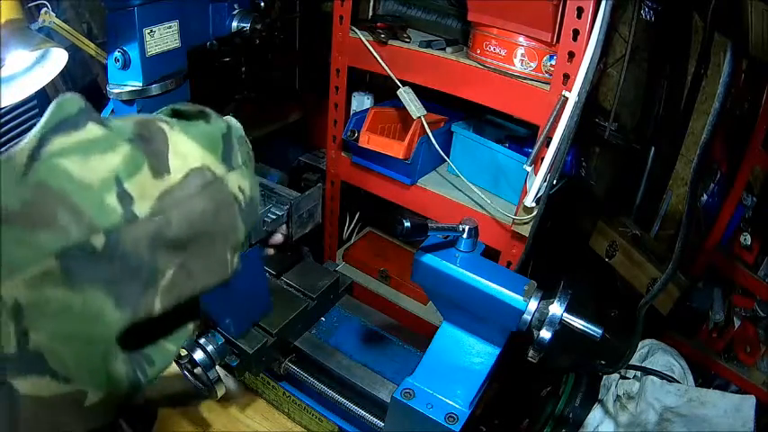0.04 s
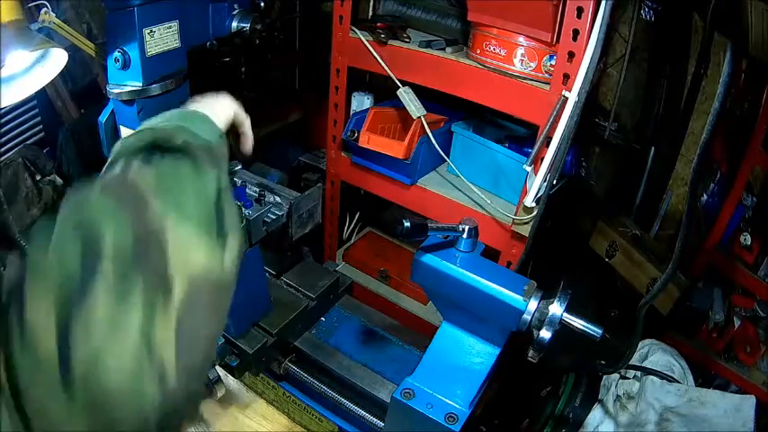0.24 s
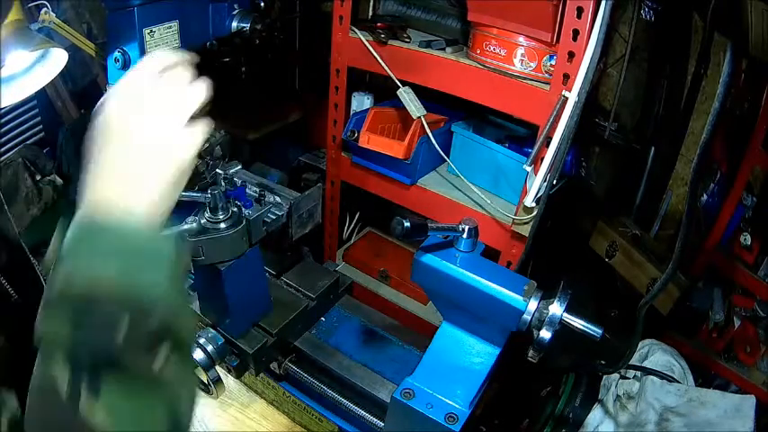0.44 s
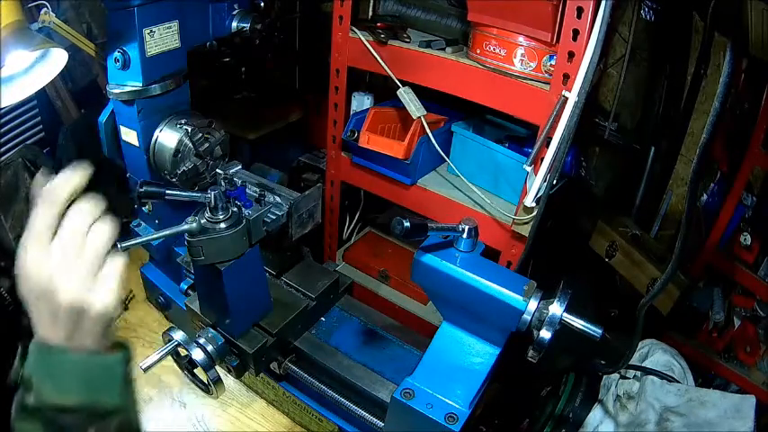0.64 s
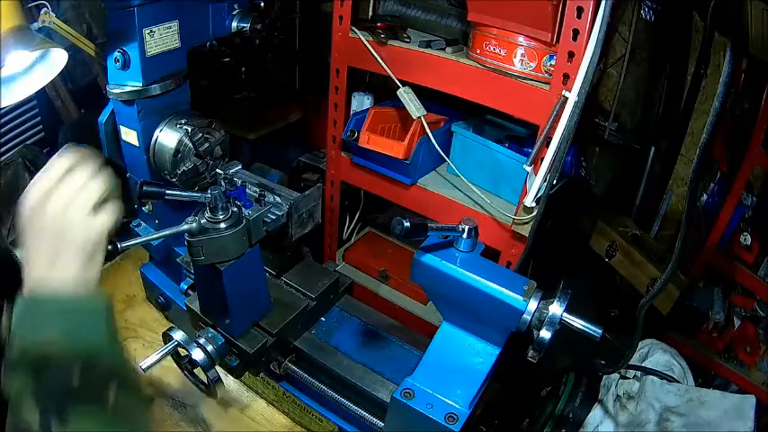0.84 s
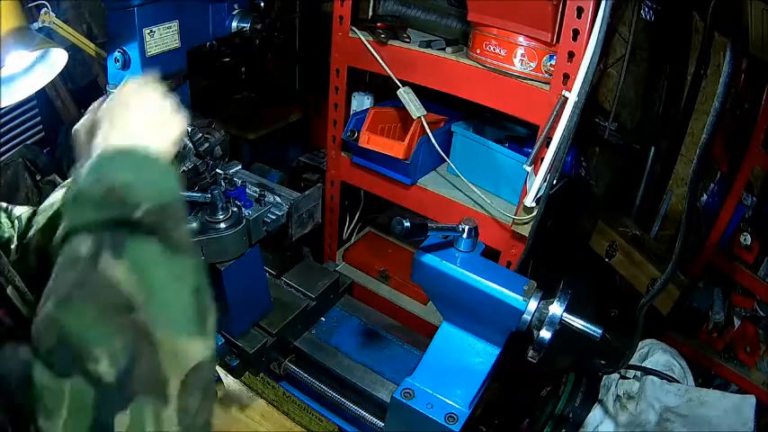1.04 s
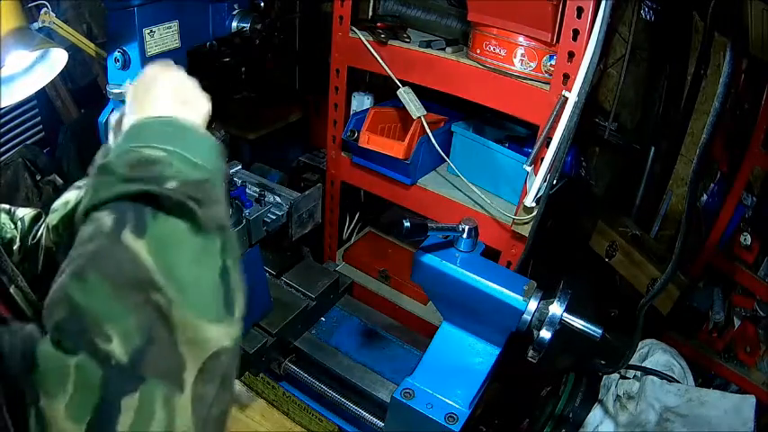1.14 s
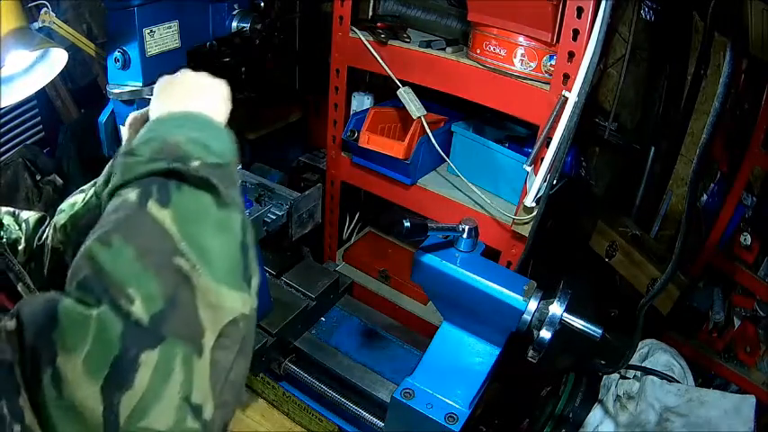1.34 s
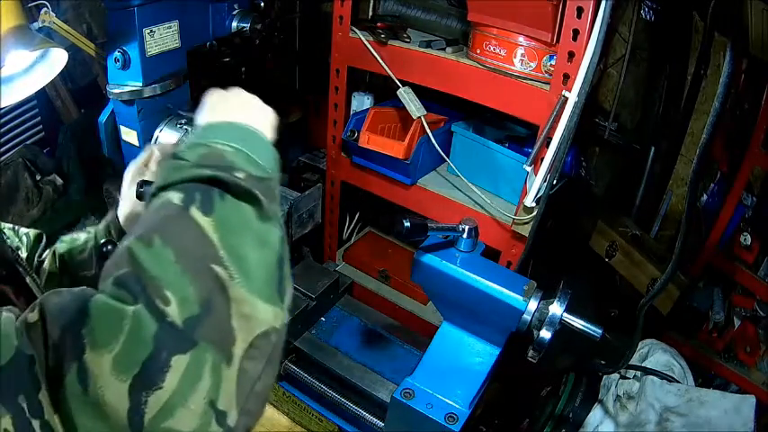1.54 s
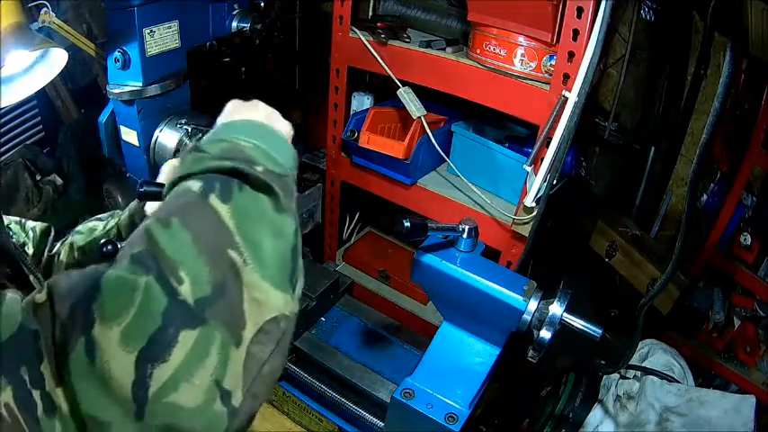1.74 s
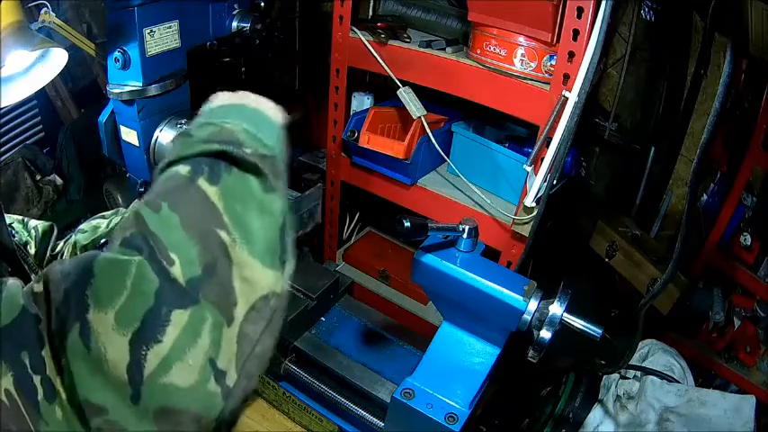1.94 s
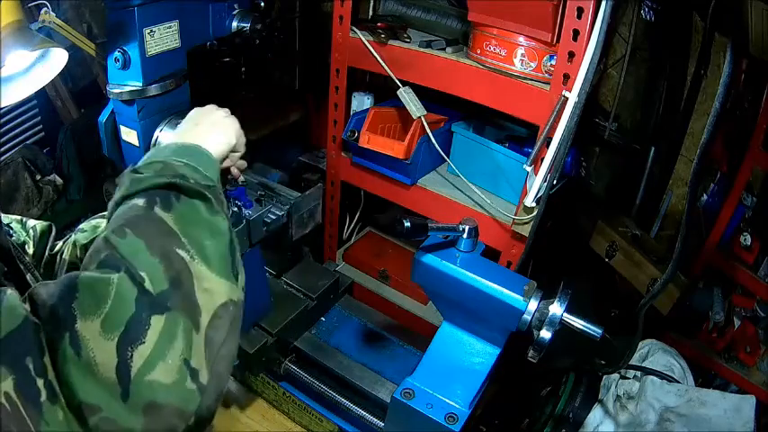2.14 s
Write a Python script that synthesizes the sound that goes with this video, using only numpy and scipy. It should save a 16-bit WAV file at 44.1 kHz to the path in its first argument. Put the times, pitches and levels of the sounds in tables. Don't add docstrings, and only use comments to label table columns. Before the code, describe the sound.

Heavy steel tool holder clunks onto a lathe toolpost, then two bright metallic clicks follow

```python
import sys
import numpy as np
from scipy import signal
from scipy.io import wavfile
from scipy.ndimage import uniform_filter1d

SR = 44100
rng = np.random.default_rng(int(sys.argv[2]) if len(sys.argv) > 2 else 0)


def level_to_linear(level):
    exponent = np.asarray(level, float) / 20
    return 10 ** exponent


def transcribe(u):
    v = np.clip(np.atleast_2d(u).T, -1, 1)
    q = np.round(v * 32767).astype(np.int16)
    wavfile.write(sys.argv[1], SR, q)


N = 97020
TIME = np.arange(N) / SR

# [t/s, peak level/dB, contact band low f/Hz, high f/Hz, crack level/dB]
CLUNK_HITS = [(.2212, -10, 626, 2100, -73), (.2337, -4, 535, 5000, -30), (.2460, -2.5, 512, 7000, -37),
              (.2482, -7.5, 564, 7800, -18), (.2505, -53, 600, 5000, -42), (.2570, -53, 900, 4500, -42),
              (.3695, -33, 900, 1390, -80), (.3740, -22, 740, 2070, -80), (.4200, -57, 700, 1500, -78),
              (.4290, -24, 900, 1870, -80), (.4370, -23.5, 504, 900, -75), (.4480, -30.5, 825, 1810, -80),
              (.4570, -60, 805, 4000, -46), (.4670, -34, 700, 1570, -81), (.5170, -43.5, 700, 1520, -80)]
# [f/Hz, level/dB, t60/s]
HOLDER_MODES = [(536, -26, 0.019), (737.6, -10, 0.077), (900, -49, 0.036), (1148.5, 2, .065),
                (1214.6, -1.5, .06), (1322, -3, .06), (1497, -42, 0.062), (1599, -3.5, .04),
                (2068, -8, 0.0363), (2310, -7.5, 0.01), (3150, -14, .03), (3450, -16.5, .04),
                (4500, -21, 0.0047), (5200, -18, 0.013)]
# [t/s, peak level/dB, contact band low f/Hz, high f/Hz, crack level/dB]
CLICK_HITS = [(.8125, -34.5, 3200, 8000, -47), (.8140, -40, 600, 3000, -69), (1.0300, -46, 2000, 4970, -51),
              (1.0780, -49, 2010, 5000, -72), (1.4222, -20.5, 520, 3000, -28.5),
              (1.4250, -21, 3000, 9500, -48), (1.4290, -25, 387, 2300, -70), (1.5220, -59, 800, 5000, -62),
              (1.5490, -63, 4000, 9000, -56), (1.5665, -19.5, 747, 2700, -28),
              (1.5680, -22, 3100, 13600, -60), (1.5730, -27, 405, 1820, -63),
              (1.9230, -45.5, 1470, 4640, -65), (2.0810, -51, 700, 3500, -73),
              (2.0990, -46.5, 1460, 3640, -70), (2.1040, -45, 2530, 4860, -50),
              (2.1090, -53, 2570, 5030, -67)]
# [f/Hz, level/dB, t60/s]
CLAMP_MODES = [(327.5, -8.5, 0.15), (575, -4.5, 0.073), (1036, 11, 0.01), (1336, 9, 0.01), (1540, 6, 0.017),
               (2056, 11.5, 0.0067), (2300, -32, 0.0041), (3000, 4, 0.0052), (3560, -3, .005),
               (3910, 3.5, 0.0047), (5170, -7.5, 0.011), (7540, -36, .02), (9300, -14, 0.016),
               (13140, -3, .01)]
# [t/s, peak level/dB, contact band low f/Hz, high f/Hz, crack level/dB]
KNOCK_HITS = [
    (.2470, -36.5, 88.5, 520, -90),
    (.2600, -30.5, 207, 416, -90),
    (.3850, -39.5, 249, 770, -90),
    (1.4400, -36.5, 148, 700, -90),
    (1.5800, -39.5, 131, 700, -88),
    (1.9270, -40.5, 500, 1220, -90),
    (1.9350, -34, 97, 600, -85),
    (1.9540, -40, 150, 490, -76),
    (2.0880, -46, 397, 900, -90),
    (2.0960, -37, 150, 590, -88),
]
# [f/Hz, level/dB, t60/s]
BENCH_MODES = [(129.6, -12.5, 0.15), (183.6, -13.5, 0.16), (255, -4.5, 0.096), (316, 0, 0.058),
               (436, -16, 0.13), (700, 1, 0.015)]
# [start t/s, length t/s, level/dB]
SLIDE_MOVES = [
    (0, 0.14, -58),
    (.78, 0.12, -55),
    (1.02, 0.038, -78),
    (1.43, 0.1, -50),
    (1.52, 0.04, -46),
    (1.6, 0.22, -63.5),
    (2.075, 0.039, -57.5),
]
# [start t/s, length t/s, level/dB]
SLEEVE_MOVES = [
    (.42, 0.37, -67),
    (1.96, 0.17, -68),
]
# [f/Hz, t60/s]
ROOM_DECAY = [(150, 0.9), (600, 0.19), (1500, 0.29), (3500, 0.26), (6000, 0.17), (12000, 0.23)]
# [f/Hz, level/dB]
ROOM_TONE = [(150, -18), (600, -3.5), (1500, -10.5), (2300, 0.5), (2800, -7), (3600, 2.5), (5200, -3),
             (12000, -25)]
# [f/Hz, level per Hz/dB]
HUM_SPECTRUM = [(20, -2.5), (70, 0), (200, -7), (950, -2), (2670, -14), (8900, -21), (12800, -21),
                (16000, -29.5)]
# [f/Hz, rms level/dB]
WHINE_TONES = [(953, -67), (11900, -82), (14287, -86), (15460, -70), (15489, -75), (15520, -83)]
# [start t/s, length t/s, f/Hz, level/dB]
DISTANT_RING = (1.13, .15, 1992, -72)

STRIKE_SPREAD_DB = 2.5
RING_T60_S = .07
SKID_SHARE, SKID_S = .15, .001
CRACK_S, CRACK_CUT_HZ = 0.0024, 7800
SLIDE_GRAINS_PER_S, SLIDE_CUT_HZ = 4000, 5000
CLOTH_LOW_HZ, CLOTH_HIGH_HZ = 4930, 5830
ROOM_DB, ROOM_GAP_S = -1, 0.0036
CLICK_ROOM_DB = -3
HUM_DB = -59
WHINE_WAVER_RAD = .45
CHIRP_HZ, CHIRP_PER_S, CHIRP_START_S = 10018, 38.0, 1.394
CHIRP_DB, CHIRP_BACK = -68, -0.4
OVERLOAD = .46
TOP_CUT_HZ = 16150


def holder_on_post():
    return blows(CLUNK_HITS, HOLDER_MODES)


def clamp_lever():
    return blows(CLICK_HITS, CLAMP_MODES)


def bench_knocks():
    return blows(KNOCK_HITS, BENCH_MODES)


def blows(hits, modes):
    out = np.zeros(N + SR)
    t = np.arange(SR // 4) / SR
    contact_t = t[:400]
    spread = rng.standard_normal((len(hits), len(modes)))
    roughness = rng.standard_normal((len(hits), 2, 400))
    for (start_s, db, low_hz, high_hz, crack_db), own, (noise, skid) in zip(hits, spread, roughness):
        high_hz = np.clip(high_hz, 1.3 * low_hz, 18000)
        softness = signal.butter(3, [low_hz, high_hz], "band", fs=SR, output="sos")
        push = (contact_t == 0) + SKID_SHARE * skid * np.exp(-contact_t / SKID_S)
        ring = np.convolve(ringing(t, modes, STRIKE_SPREAD_DB * own), push)[:len(t)]
        ring = signal.sosfilt(softness, ring)
        ring = level_to_linear(db) * ring / np.abs(ring).max()
        crack = band(noise * np.exp(-contact_t / CRACK_S), 3000, CRACK_CUT_HZ)
        ring[:400] += level_to_linear(crack_db) * crack
        first = int(start_s * SR)
        out[first:first + len(t)] += ring
    return out[:N]


def ringing(t, modes, strengths_db):
    hz, db, t60 = np.transpose(modes)[:, :, None]
    t60 = np.clip(t60, .004, RING_T60_S * (1000 / hz) ** 2 + .007)
    decay = level_to_linear(db + strengths_db[:, None] - 60 * t / t60)
    return np.sum(decay * np.sin(2 * np.pi * hz * t), axis=0)


def slides():
    grains = (rng.random(N) < SLIDE_GRAINS_PER_S / SR) * rng.standard_normal(N)
    grit = grains * level_to_linear(2.0 * rng.exponential(1, N).clip(0, 4))
    body = ringing(np.arange(SR // 8) / SR, CLAMP_MODES, np.zeros(len(CLAMP_MODES)))
    scrape = band(signal.fftconvolve(grit, body)[:N], 170, SLIDE_CUT_HZ)
    return swells(SLIDE_MOVES) * rms_one(scrape)


def sleeve():
    uneven = level_to_linear(1.05 * slow_noise(500))
    fibres = band(rng.standard_normal(N), CLOTH_LOW_HZ, CLOTH_HIGH_HZ)
    return swells(SLEEVE_MOVES) * uneven * rms_one(fibres)


def workshop(x):
    t = np.arange(SR // 2) / SR
    white = rng.standard_normal((2, len(t)))
    echo = 0
    for k, (low, high, hz) in enumerate(bands()):
        decay = level_to_linear(at_hz(ROOM_TONE, hz) - 60 * t / at_hz(ROOM_DECAY, hz))
        echo = echo + decay * band(white[k % 2], low, high)
    echo = echo * np.clip(t / ROOM_GAP_S - .5, 0, 1)
    return level_to_linear(ROOM_DB - 26.5) * signal.fftconvolve(x, echo)[:N]


def whines():
    tones = sum(level_to_linear(db) * np.sin(2 * np.pi * hz * TIME + WHINE_WAVER_RAD * slow_noise(1500))
                for hz, db in WHINE_TONES)
    on = uniform_filter1d(1. * ((TIME - CHIRP_START_S) * CHIRP_PER_S % 1 < .5), size=40)
    gate = on + CHIRP_BACK * (1 - on)
    tones = tones + level_to_linear(CHIRP_DB) * gate * np.sin(2 * np.pi * CHIRP_HZ * TIME)
    start_s, length_s, hz, db = DISTANT_RING
    tones = tones + swells([(start_s, length_s, db)]) * np.sin(2 * np.pi * hz * TIME)
    return np.sqrt(2) * tones


def hum():
    white, out = rng.standard_normal((2, N + SR)), 0
    for k, (low, high, hz) in enumerate(bands()):
        level = level_to_linear(at_hz(HUM_SPECTRUM, hz) + 0.27 * slow_noise(5000))
        out = out + level * band(white[k % 2], low, high)[SR:]
    return level_to_linear(HUM_DB) * rms_one(out)


def swells(rows):
    return sum(level_to_linear(db) * np.sin(np.pi * np.clip((TIME - start_s) / length_s, 0, 1)).clip(0) ** .5
               for start_s, length_s, db in rows)


def slow_noise(size):
    return rms_one(uniform_filter1d(rng.standard_normal(N), size=size))


def rms_one(x):
    return x / np.sqrt(np.mean(x ** 2) + 1e-20)


def at_hz(points, hz):
    table_hz, values = np.transpose(points)
    return np.interp(np.log(hz), np.log(table_hz), values)


def band(x, low_hz, high_hz):
    return signal.sosfilt(signal.butter(2, [low_hz, high_hz], "band", fs=SR, output="sos"), x)


def bands():
    edges = 20 * 2 ** np.arange(0, 10.01, 1 / 3)
    return zip(edges, edges[1:], np.sqrt(edges[1:] * edges[:-1]))


def scene():
    heavy = holder_on_post() + bench_knocks()
    light = clamp_lever()
    room = workshop(heavy + level_to_linear(CLICK_ROOM_DB) * light)
    mix = heavy + light + room + slides() + sleeve() + hum() + whines()
    return mix[None]


def low_pass(x):
    return signal.sosfilt(signal.butter(12, 16790, fs=SR, output="sos"), x)


def record(dry):
    x = dry / (1 + np.abs(dry / OVERLOAD) ** 8) ** (1 / 8)
    x = signal.sosfilt(signal.cheby2(20, 60, TOP_CUT_HZ, fs=SR, output="sos"), x)
    return low_pass(x)


dry = scene()
out = record(dry)
transcribe(out)
```